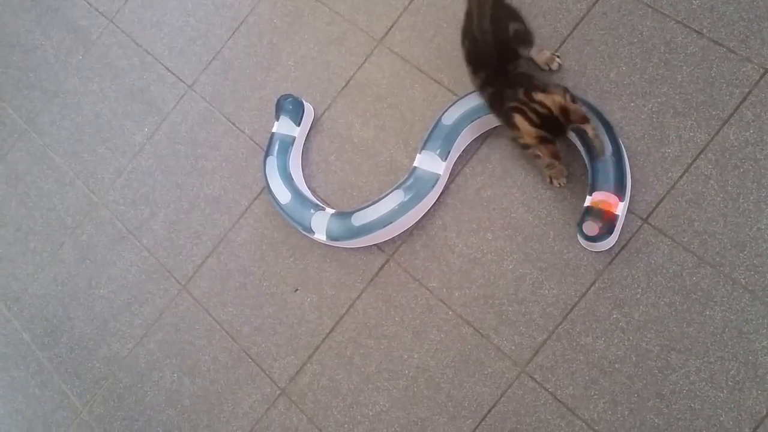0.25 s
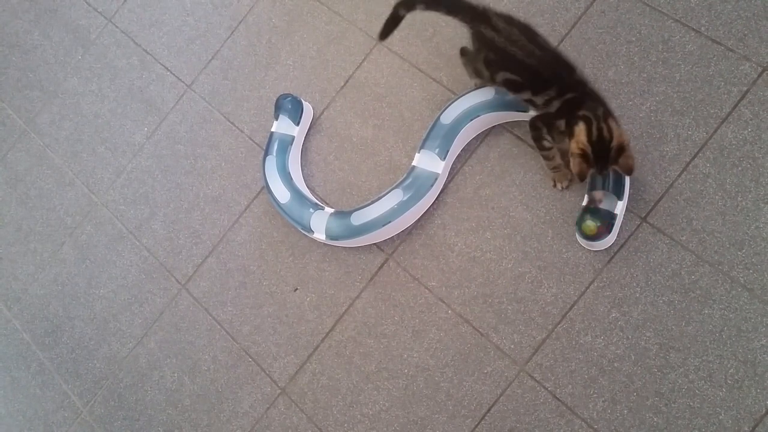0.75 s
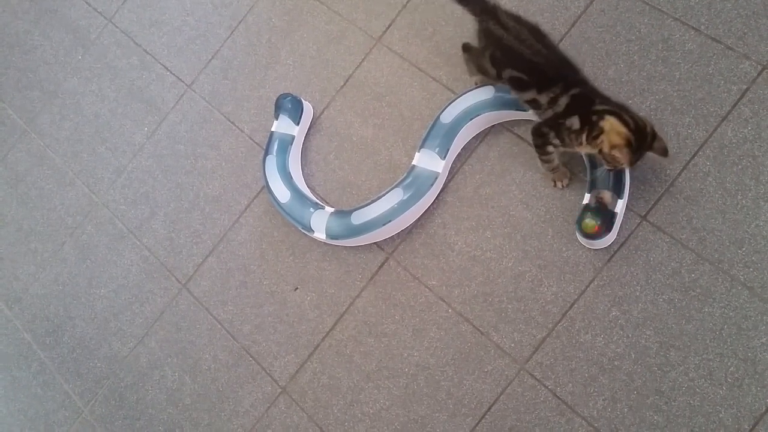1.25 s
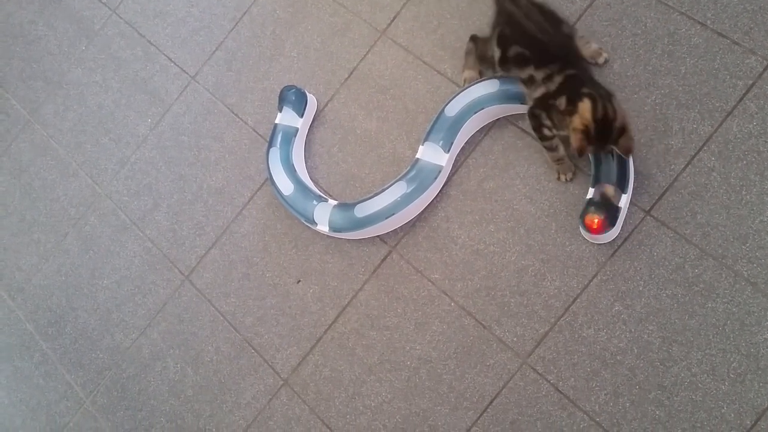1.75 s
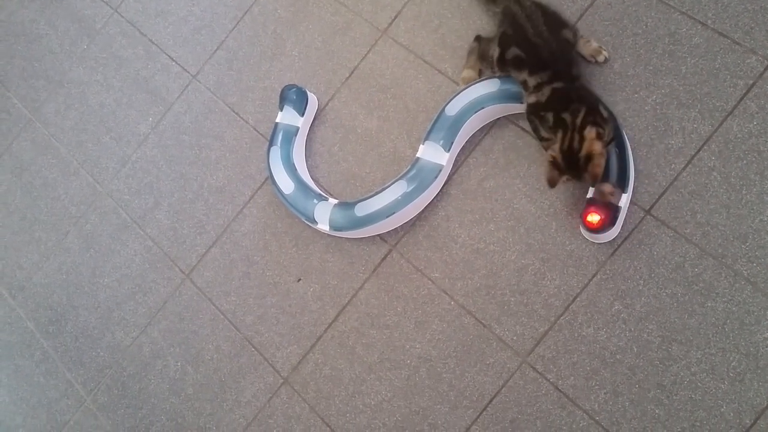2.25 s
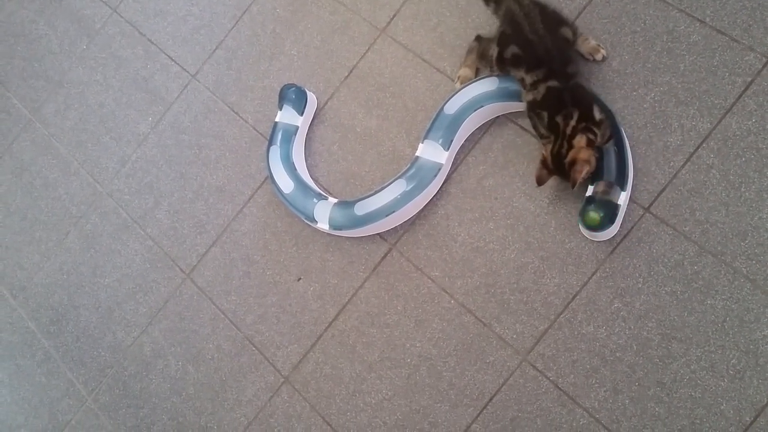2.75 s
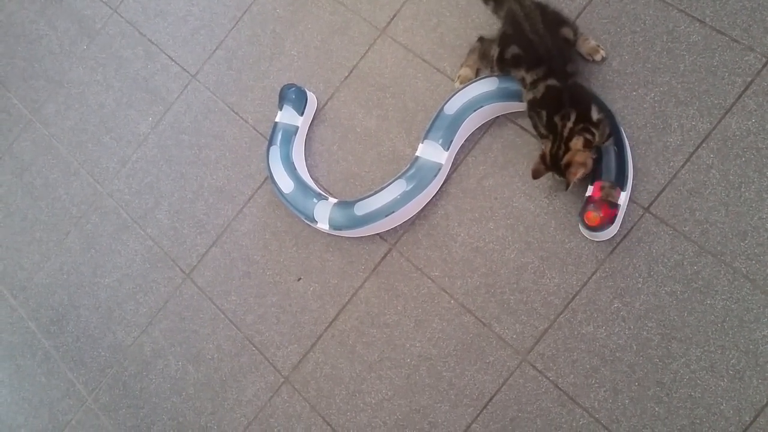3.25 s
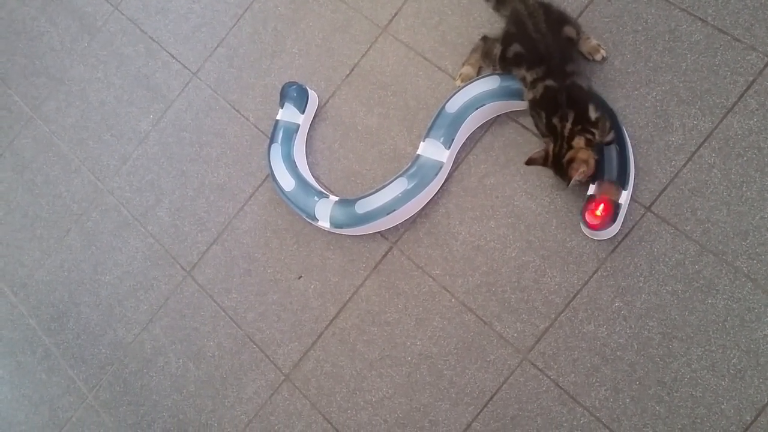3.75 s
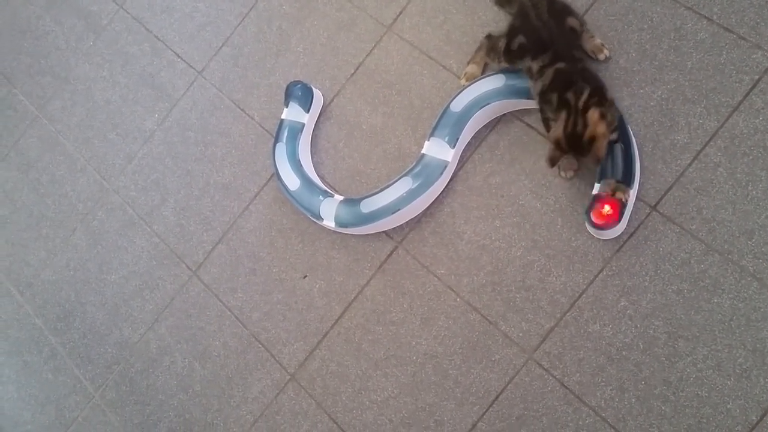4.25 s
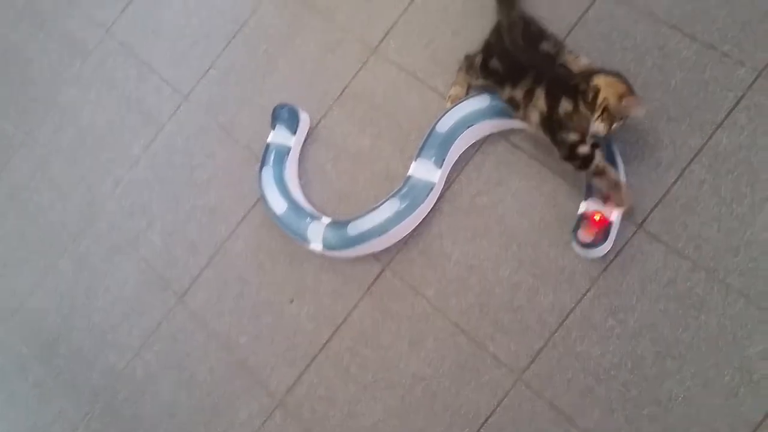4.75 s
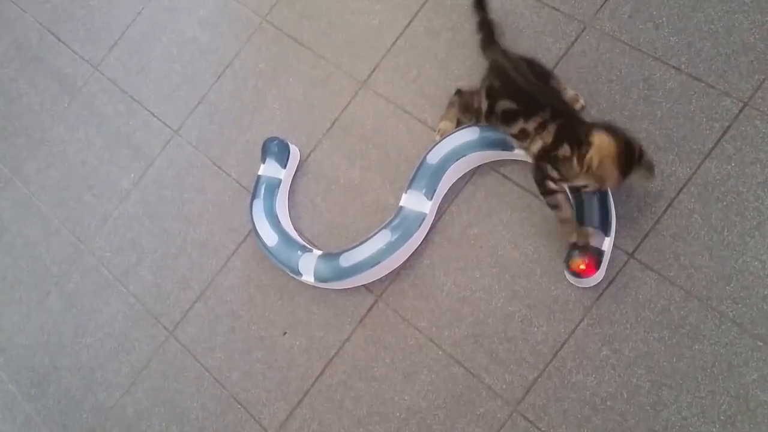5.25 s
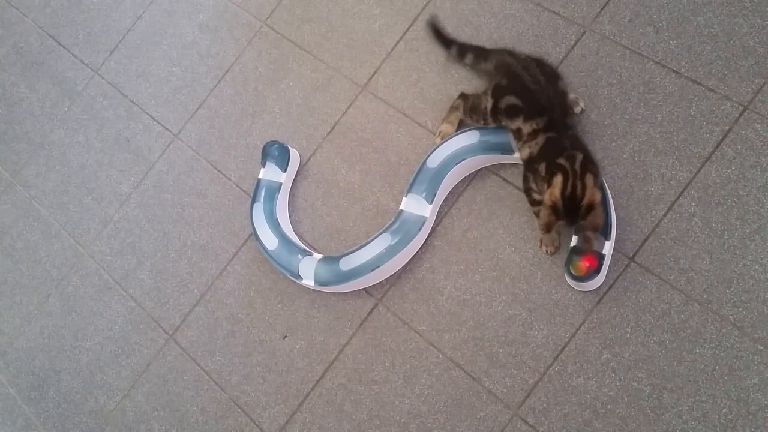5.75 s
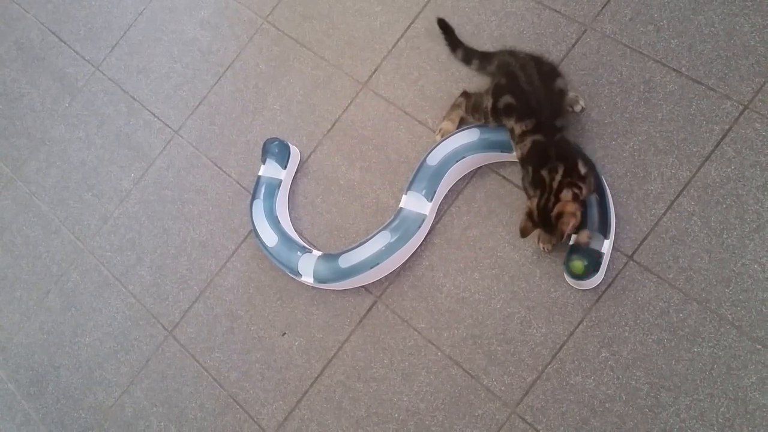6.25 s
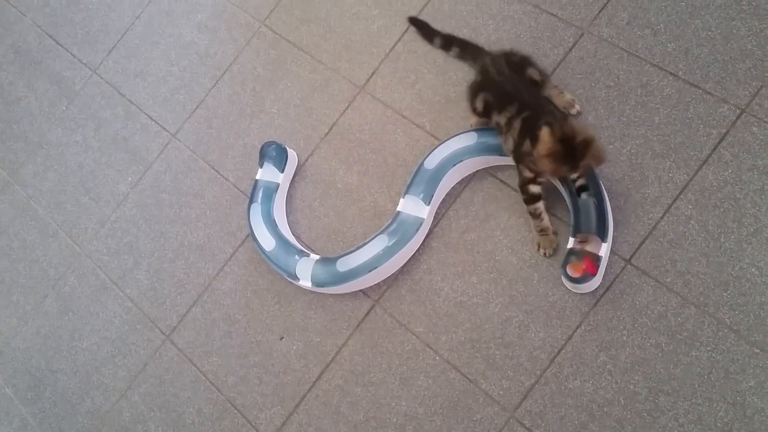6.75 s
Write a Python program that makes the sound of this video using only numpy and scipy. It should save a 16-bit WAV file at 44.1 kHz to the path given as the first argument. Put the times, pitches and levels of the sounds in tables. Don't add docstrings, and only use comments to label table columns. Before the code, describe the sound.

A kitten bats a hollow plastic ball at the end of a curved plastic track. Light taps grow into sharp clacks with short rolling rattles, then soften, nearly stop, and return livelier. A thin high squeak and a faint dry tick mark the lull. Each knock leaves a wide, hard-room tail over a low appliance hum; the microphone stands a little way off.

```python
import sys
import numpy as np
from scipy import signal
from scipy.fft import rfft, irfft
from scipy.io import wavfile

SR = 44100
rng = np.random.default_rng(int(sys.argv[2]) if len(sys.argv) > 2 else 0)


def transcribe(u):
    v = np.clip(np.atleast_2d(u).T, -1, 1)
    q = np.round(v * 32767).astype(np.int16)
    wavfile.write(sys.argv[1], SR, q)


def voltage_ratio(decibels):
    exponent = np.asarray(decibels, float) / 20
    return 10 ** exponent


N = 309141

# t/s, strength
# level/dB, cover minus trough level/dB, shell over track level/dB, click over track level/dB
BALL_KNOCKS = [(0.197, -43.5, -6, -9, -23), (0.282, -37, 15, -8, -12), (0.295, -30, 12, -6, -8),
               (0.43, -37.5, 15, 3, 3.5), (0.441, -30, 25, 4, 0.5), (0.549, -35.5, 10, 8.5, 1),
               (0.698, -31.5, 12, 6, -7), (0.712, -17, 7.5, -2.5, -6), (0.864, -20, 18, 2.5, -1.5),
               (0.933, -27.5, -2, 6, -6), (1.145, -25, 5, 3, -8), (1.179, -25.5, 0.5, 9.5, -2.5),
               (1.394, -29.5, 1, 0, -9), (1.446, -27, 5, 0, -23), (1.476, -33, 7, 7, -1.5),
               (1.676, -32, -0.5, 6.5, -6.5), (1.764, -23.5, 5.5, 1, -16), (1.807, -28.5, -13, 7, 0.5),
               (1.966, -27.5, -10, 7.5, -1), (2.082, -32, 57, -4, -1.5), (2.104, -35.5, -18, 1, -22),
               (2.175, -25, 3.5, 2.5, -3),
               (2.4, -38.5, 16.5, 5, -7), (2.488, -37, 1, 3.5, -0.5), (2.641, -32, -5.5, -5, -12),
               (2.664, -32, -2, 0, -20), (2.69, -33.5, -5, -12, -16), (2.772, -29, 0, -1, -11),
               (2.812, -29.5, -1.5, -2, -17), (2.842, -35.5, 21, 2, -7), (2.913, -28.5, -18, -0.5, -25),
               (3.103, -29.5, 2, -1.5, -8), (3.186, -30, -3.5, -4, -11.5), (3.345, -27.5, -3, -1.5, -14.5),
               (3.877, -51, -10, -6.5, -22), (4.629, -36, 9, -8, -12), (4.736, -34.5, 7, -1.5, -13.5),
               (4.836, -38.5, 15, -11, -24), (4.851, -28, 17, -10.5, -25), (4.907, -33, 0, 6, -6),
               (4.928, -30, 10, 10, -2.5),
               (5.008, -21, 22, 1, -6.5), (5.071, -21, 25, -17, -25), (5.146, -26, 25, 3, -3),
              (5.32, -22.5, 22, -0.5, -11), (5.411, -20.5, 25, -24, -18), (5.432, -24.5, -5, 6, -7.5),
              (5.587, -24, -3.5, -6.5, -16), (5.633, -24.5, 0, 3.5, -17), (5.652, -24.5, -3, 4, 2.5),
              (5.797, -30, 0, 7, -9), (5.889, -24.5, -0.5, 3, -4.5), (5.915, -36, -9, 0, 6),
              (6.115, -26, -4, 5, -9.5), (6.144, -30, -5, 1, -10), (6.288, -22.5, -3, 4, -6),
              (6.506, -34, -1, -9, -17), (6.543, -35.5, -2, -1.5, -20), (6.711, -49.5, -4, 13.5, 9),
              (6.821, -27, 1.5, 2.5, -9.5), (6.895, -28, 4.5, -7, -15)]
KNOCKS = np.transpose(BALL_KNOCKS)


def rms_one(x):
    return x / np.sqrt(np.mean(x ** 2) + 1e-20)


def at_hz(points, hz):
    points = np.array(points)
    return np.interp(np.log(hz), np.log(np.maximum(points[:, 0], 1)), points[:, 1])


def drift(rate):
    r = np.exp(-80 * np.pi * rate / SR)
    white = rng.standard_normal(N // 40 + 2002)
    slow = signal.lfilter([1], [1, -2 * r, r * r], white)[2000:]
    return np.interp(np.arange(N) / 40, np.arange(len(slow)), rms_one(slow))


def ring(clicks, hz, t60):
    r = voltage_ratio(-60 / (max(t60, .002) * SR))
    w = 2 * np.pi * hz / SR
    return signal.lfilter([0, np.sin(w)], [1, -2 * r * np.cos(w), r * r], clicks + 1e-18)


def stereo_bands(size):
    # f/Hz, correlation
    likeness = [(30, 0.39), (80, 0.59), (250, 0.59), (500, 0.68), (1000, 0.074), (14000, 0)]
    edges = 30 * 2 ** np.arange(0, 9.3, .5)
    white = rng.standard_normal((2, 2, size))
    for k, (low, high) in enumerate(zip(edges, edges[1:])):
        band = signal.butter(2, [low, high], "band", fs=SR, output="sos")
        mid, side = signal.sosfilt(band, white[k % 2])
        hz = np.sqrt(low * high)
        alike = np.clip(at_hz(likeness, hz), 0, 1)
        yield hz, np.sqrt(1 + alike) * mid + np.sqrt(1 - alike) * side * [[1], [-1]]


def gate(play):
    shut_db, knee_db, range_db = -56.5, -71.5, 15
    follows, smoothing_s, start_db = 0.33, 0.043, -53
    r = np.exp(-1 / (smoothing_s * SR))
    power, _ = signal.lfilter([1 - r], [1, -r], np.mean(play ** 2, axis=0), zi=[voltage_ratio(start_db) ** 2])
    over_db = np.maximum(10 * np.log10(power + 1e-12) - knee_db, 0)
    return shut_db + range_db * np.tanh(follows * over_db / range_db * 1.04)


def hum(gate_db):
    # f/Hz, level/dB per Hz
    rumble = [(18, -18), (38, -12), (60, 8), (113, 5), (200, 4), (400, 1.5), (700, 4.5), (1000, -9.5),
              (1500, -7.5), (2500, -18.5), (3500, -8), (5000, -53), (8000, -51), (12000, -62)]
    # f/Hz, level/dB rms
    mains = [(49, -73.5), (96, -77), (142, -80), (195, -80), (385, -80.5)]
    noise = rms_one(sum(voltage_ratio(at_hz(rumble, hz) + 1.2 * drift(8)) * band for hz, band in stereo_bands(size=N)))
    hiss = np.array([rms_one(ring(white, 3510, 0.012)) for white in rng.standard_normal((2, N))])
    t = np.arange(N) / SR
    lines = np.zeros(N)
    for hz, level_db in mains:
        phase = 2 * np.pi * hz * t + 1.73 * drift(4.16)
        lines += voltage_ratio(level_db + 1.05 * drift(15.0)) * np.sin(phase)
    return voltage_ratio(gate_db) * (voltage_ratio(-7.5) * noise + voltage_ratio(-18.0) * hiss + voltage_ratio(63) * lines)


def rolling(s):
    # t/s, rolling time/s, level/dB, brightness level/dB
    rolls = [(0.0, 0.0099, -59.5, -8.5), (0.272, 0.42, -51, -4), (.45, 0.19, -54, 1),
             (.79, 0.038, -40.5, 1), (0.859, 0.044, -33, -10), (1.16, 0.097, -45, -7.5),
             (1.439, 0.04, -42, -5.5), (1.71, 0.27, -42, -9), (2.079, 0.05, -39.5, -11.5),
             (2.2, 0.025, -44.5, -10), (2.34, 0.26, -56, -13), (2.66, 0.031, -48.5, -18),
             (2.8, 0.19, -42.5, -9), (3.0, 0.13, -48.5, -9), (3.35, 0.057, -53, -11.5),
             (4.04, 0.028, -64.5, -6), (4.65, .1, -60, -14), (4.8, 0.15, -52.5, -10.5),
             (5.001, 0.14, -36.5, -9), (5.34, 0.025, -37.5, -12.5), (5.418, 0.021, -33.5, -7.5),
             (5.6, 0.13, -41.5, -1), (5.76, 0.098, -38.5, -7.5), (5.92, 0.42, -51, -4),
             (6.15, 0.019, -42, -13.5), (6.3, 0.073, -45.5, -9), (6.52, 0.097, -46.5, -11.5),
             (6.91, 0.015, -46.5, -13)]
    rise_db_per_s, fall_db_per_s, rest_db = 310, 134, -77
    start, length, level_db, bright_db = np.transpose(rolls)[:, :, None]
    rise_db = rise_db_per_s * np.maximum(start - s, 0)
    fall_db = fall_db_per_s * np.maximum(s - start - length, 0)
    shape_db = level_db - rise_db - fall_db
    return np.maximum(shape_db.max(axis=0), rest_db), bright_db[shape_db.argmax(axis=0), 0]


def track():
    # f/Hz, level/dB, t60/s
    trough = [(317, -19, 0.12), (392, -18, 0.1), (532, -9.5, 0.05), (713, -5, 0.018), (807.4, 3, 0.026),
              (863, 0.5, 0.025), (934, -5.5, 0.094)]
    cover = [(1037, -1, 0.029), (1046, -6.5, 0.047), (1150, -1, 0.028), (1228, -3.5, 0.023),
             (1301, 0, 0.019), (1474, -2, 0.019)]
    shell = [(1672, -4, 0.013), (1895, -7.5, 0.025), (2000, -8, 0.013), (2173, -14.5, 0.048),
             (2231, -0.5, 0.014), (2365, -0.5, 0.0093), (2435, -3, 0.011), (2670, -7.5, 0.011)]
    contact = [(3072, -5.5, 0.012), (3407, -1, 0.01), (3860, 0, 0.0033), (4390, -4.5, 0.0009),
               (5190, -2.5, 0.0018), (6280, -5, 0.0027), (7390, -1.5, 0.0024), (9030, -4, 0.0011),
               (10100, -11.5, 0.0034), (12280, -14, 0.0024)]
    s, strength_db, place_db, hard_db, click_db = KNOCKS
    at = np.round((s + .0004) * SR).astype(int)
    touch = np.flatnonzero(rng.random(N) < 200 * voltage_ratio(2.0 * drift(20)) / SR)
    roll_db, bright_db = rolling(touch / SR)
    chatter_db = roll_db + 3 * np.minimum(rng.exponential(1, len(touch)), 3)
    # modes, knock level/dB, chatter level/dB
    families = [(trough, -6 - np.maximum(place_db, 0), -9),
                (cover, -3.5 + np.minimum(place_db, 0), -9),
                (shell, -1.5 + hard_db, -4.5 + 1.5),
                (contact, click_db, bright_db)]
    out = np.zeros(N)
    for modes, knock_db, rattle_db in families:
        luck = rng.standard_normal((len(at), len(modes)))
        family = np.zeros(N)
        for k, (hz, level_db, t60) in enumerate(modes):
            clicks = np.zeros(N)
            clicks[touch] = voltage_ratio(chatter_db + rattle_db) * rng.standard_normal(len(touch))
            share = np.sign(luck[:, k] + .25) * (.8 + .25 * abs(luck[:, k]))
            clicks[at] += voltage_ratio(strength_db + knock_db) * share
            family += voltage_ratio(level_db) * ring(clicks, hz, t60)
        edges = [.85 * modes[0][0], 1.1 * modes[-1][0]]
        out += signal.sosfilt(signal.butter(2, edges, "band", fs=SR, output="sos"), family)
    return out


def facing():
    open_s = [.864, 1.179, 2.175, 3.345, 5.411, 1.807, 1.966, 2.082, 2.104, 2.641, 2.913, 4.852, 4.927,
              5.072, 5.432, 6.288, 6.821, 6.895]
    s = KNOCKS[0]
    latest = np.searchsorted(s - .001, np.arange(N) / SR) - 1
    in_the_open = np.abs(s[:, None] - open_s).min(axis=1) < .005
    return voltage_ratio(-5 + 2.5 * in_the_open)[latest]


def room(x):
    # f/Hz, t60/s
    room_t60 = [(150, 0.51), (500, 0.48), (1000, 0.6), (2500, 0.6), (5000, 0.69), (10000, 0.41)]
    t = np.arange(SR * 3 // 4) / SR
    place = 2 * np.pi * 1.7 * np.arange(N) / SR + 2 * drift(2)
    out = 0
    for share in (np.cos(place), np.sin(place), np.cos(2 * place + 1)):
        tail = sum(band * voltage_ratio(-60 * t / at_hz(room_t60, hz)) for hz, band in stereo_bands(size=len(t)))
        tail = tail * np.clip((t - .003) / 0.0022, 0, 1)
        tail *= voltage_ratio(4 * drift(70)[:len(t)] * np.exp(-t / .07))
        tail /= np.sqrt(np.sum(tail ** 2) * .75)
        out = out + signal.fftconvolve(share * x[None], tail, axes=1)[:, :N]
    return out


def thuds():
    # t/s, peak level/dB, t60/s
    blows = [
        (1.825, -48, 0.36),
        (1.87, -47, 0.28),
        (4.715, -46, 0.034),
    ]
    # f/Hz, level/dB
    floor_modes = [(55, 2.5), (111, -11.5), (147, 2), (230, -2)]
    out = np.zeros(N)
    for s, peak_db, t60 in blows:
        clicks = np.zeros(N)
        clicks[round(s * SR)] = voltage_ratio(peak_db)
        out += sum(voltage_ratio(level_db) * ring(clicks, hz, t60) for hz, level_db in floor_modes)
    return signal.sosfilt(signal.butter(2, 300, fs=SR, output="sos"), out)


def in_time(rows, outside=None):
    s, *columns = np.transpose(rows)
    return [np.interp(np.arange(N) / SR, s, c, outside, outside) for c in columns]


def squeak():
    # t/s, third partial f/Hz, level/dB
    glide = [
        (3.72, 12050, -84),
        (3.75, 12150, -83),
        (3.78, 12350, -83),
        (3.803, 11900, -88),
        (3.835, 12500, -81),
        (3.87, 12350, -79),
        (3.91, 12000, -83),
        (3.95, 11750, -90),
        (4.01, 12000, -96),
    ]
    third_hz, level_db = in_time(glide)
    t = np.arange(N) / SR
    sounding = np.clip(np.minimum(t - glide[0][0], glide[-1][0] - t) / 0.014, 0, 1)
    phase = 2 * np.pi * np.cumsum(third_hz * (1 + .004 * drift(90))) / 3 / SR
    partials = np.sin(3 * phase) + voltage_ratio(-9) * np.sin(2 * phase)
    return sounding * voltage_ratio(level_db + 5.5 + 2.1 * drift(55)) * partials


def tick():
    # t/s, peak level/dB
    strikes = [
        (4.029, -48),
    ]
    clicks = np.zeros(N)
    for s, peak_db in strikes:
        at = round(s * SR)
        skid_db = peak_db - 5.5 - 2.6 * np.arange(10)
        clicks[at:at + 4000:400] = voltage_ratio(skid_db) * rng.standard_normal(10)
    # f/Hz, level/dB
    modes = [(1120, -5), (1700, -17), (2250, -14), (3330, 3.5), (3480, -4), (3890, 5), (4690, -4),
             (5800, -18), (6600, -11), (7400, -24)]
    ringing = sum(voltage_ratio(level_db) * ring(clicks, hz, .008) for hz, level_db in modes)
    return signal.sosfilt(signal.butter(4, 7500, fs=SR, output="sos"), ringing)


def scene():
    # f/Hz, left minus right level/dB
    balance = [(60, -35), (130, 9), (280, -4), (620, 0), (1340, -2.5), (2920, -5.5), (6360, -0.5),
               (13800, -5)]
    toy = track()
    soft = signal.sosfilt(signal.butter(2, 4500, fs=SR, output="sos"), toy)
    direct = np.array([np.roll(soft, 5), soft])
    play = facing() * direct + room(toy + tick())
    lean_db = at_hz(balance, np.fft.rfftfreq(N, 1 / SR) + 1) / 2
    play = irfft(rfft(play) * voltage_ratio([lean_db, -lean_db]), N)
    return play + squeak() + thuds() + hum(gate(play))


def drop_weak_treble(x):
    # f/Hz, level/dB
    threshold = [(7000, -125), (7700, -110), (8600, -104), (10000, -101), (10700, -95), (11500, -99),
                 (12500, -100), (13400, -102), (14200, -70)]
    hz, _, frames = signal.stft(x, SR, nperseg=2048)
    power = np.abs(frames) ** 2 + 1e-20
    loud_db = 10 * np.log10(power[:, 30:200].mean(axis=1))
    for low in range(320, 700, 32):
        band = slice(low, low + 32)
        band_db = 10 * np.log10(power[:, band].mean(axis=1))
        over_db = band_db - at_hz(threshold, hz[low + 16]) - .3 * (loud_db + 70)
        over_db += 2 * rng.standard_normal(over_db.shape)
        frames[:, band] *= over_db[:, None] > 0
    return signal.istft(frames, SR, nperseg=2048)[1][:, :N]


def roll_off(x):
    return signal.sosfilt(signal.butter(12, 14440, fs=SR, output="sos"), x)


def record(dry):
    mix = drop_weak_treble(dry) - .0005
    return roll_off(mix)


dry = scene()
out = record(dry)
transcribe(out)
```